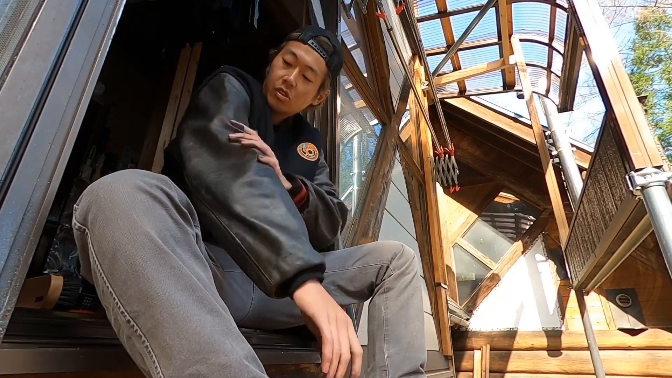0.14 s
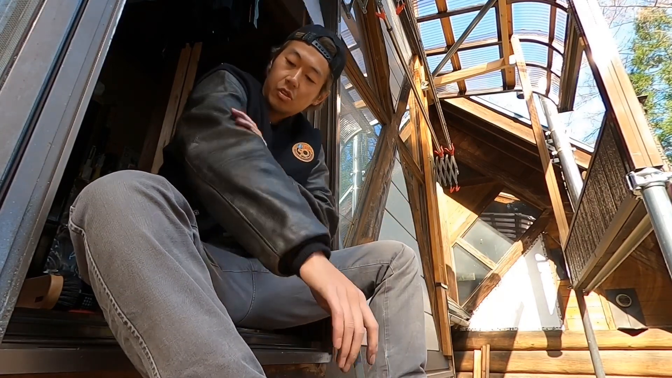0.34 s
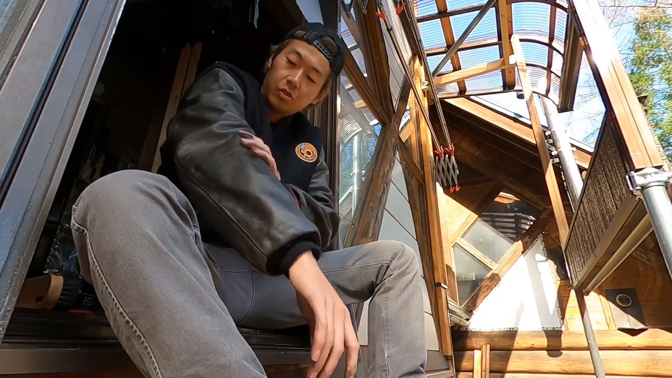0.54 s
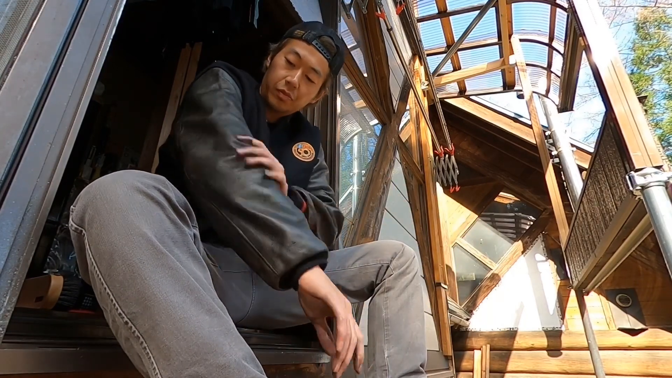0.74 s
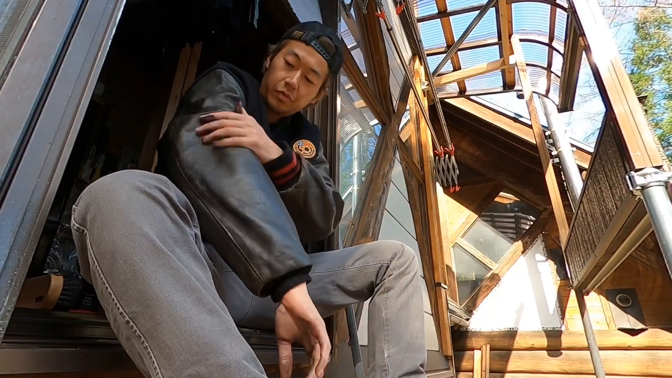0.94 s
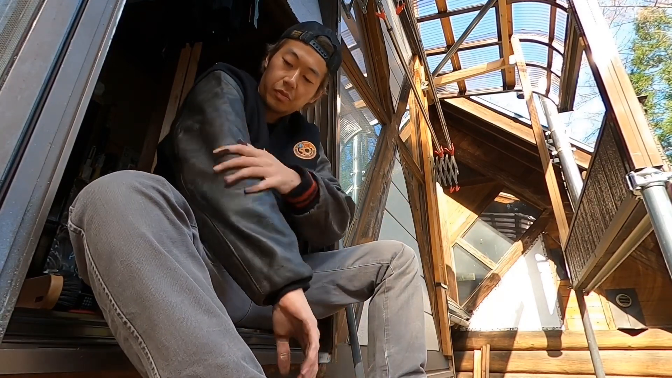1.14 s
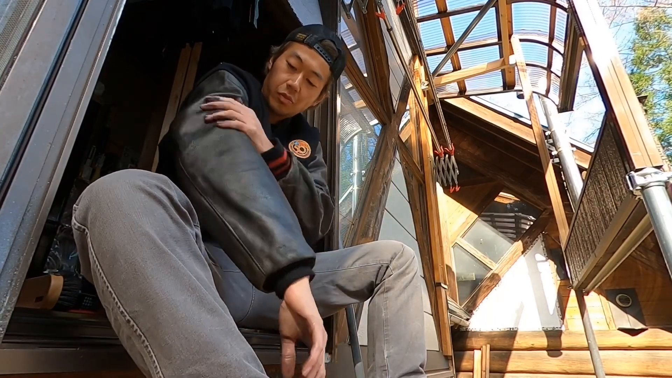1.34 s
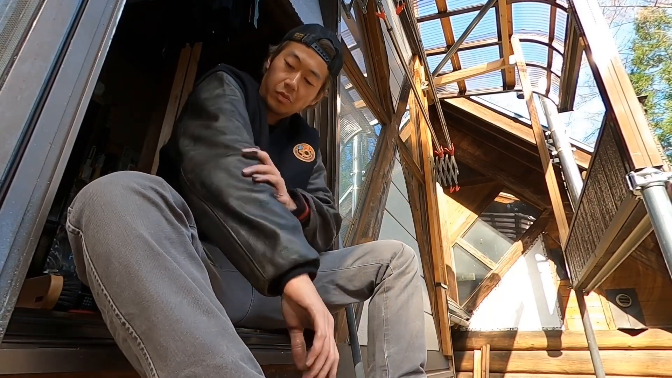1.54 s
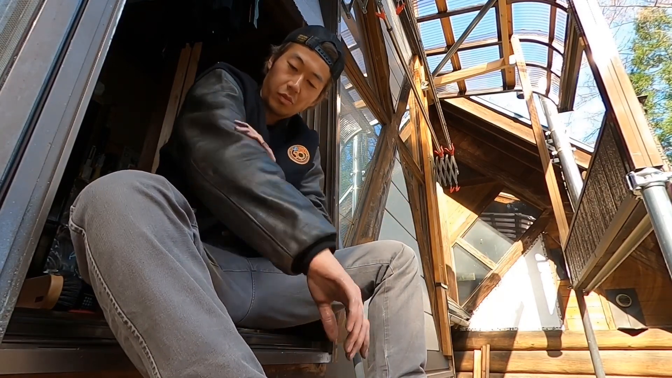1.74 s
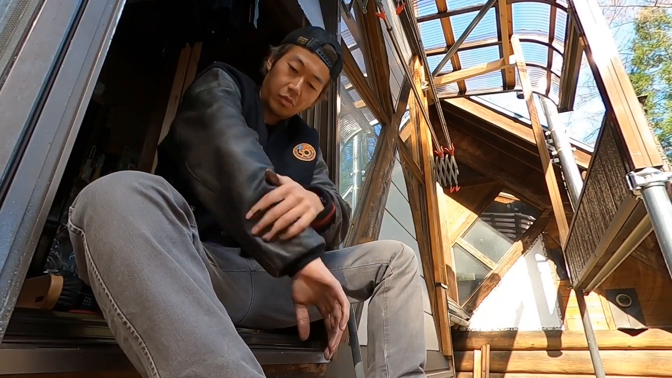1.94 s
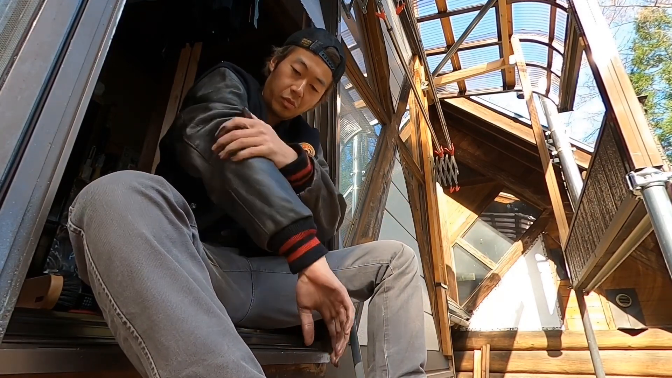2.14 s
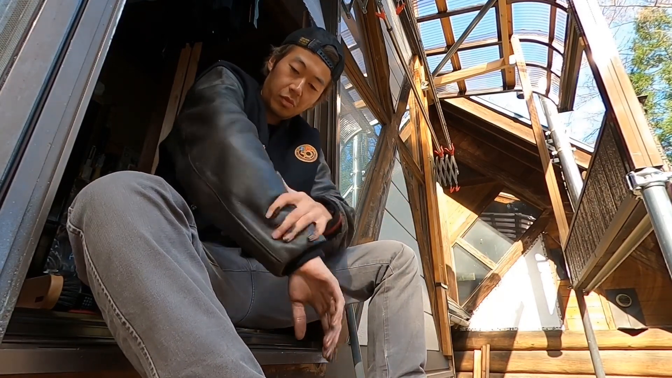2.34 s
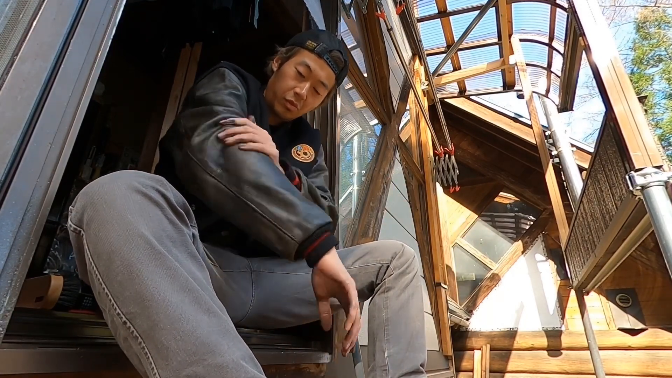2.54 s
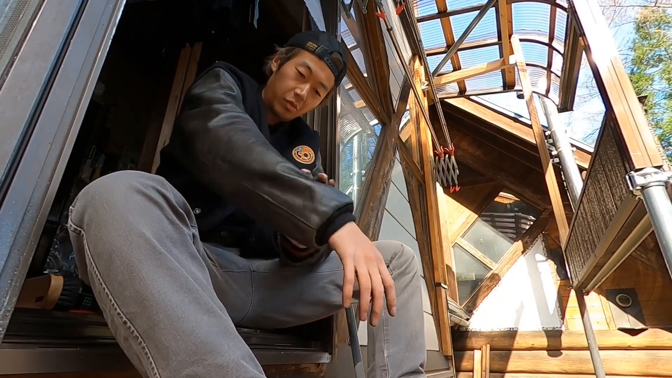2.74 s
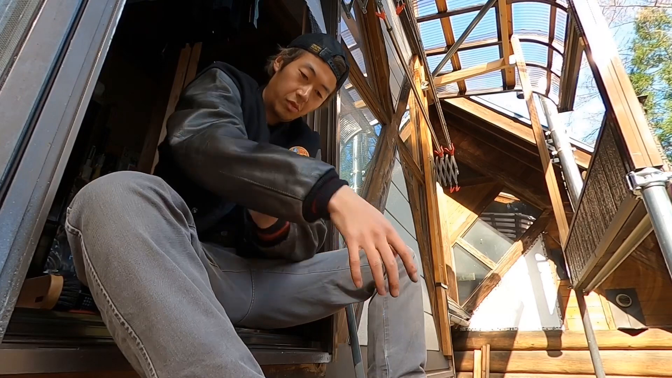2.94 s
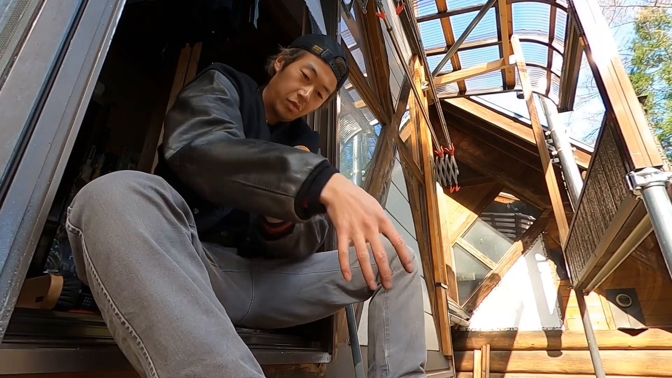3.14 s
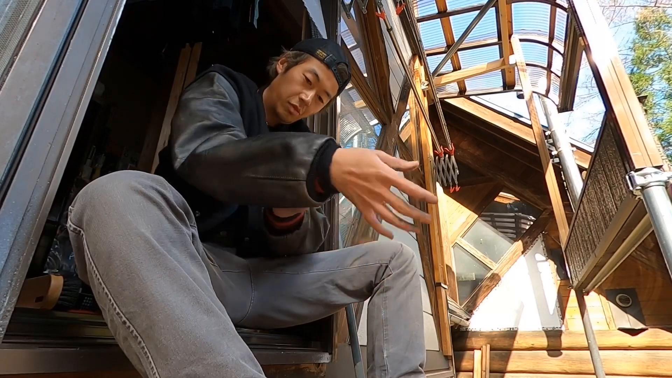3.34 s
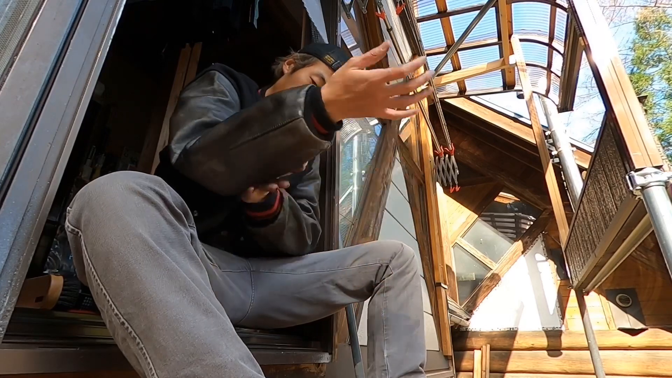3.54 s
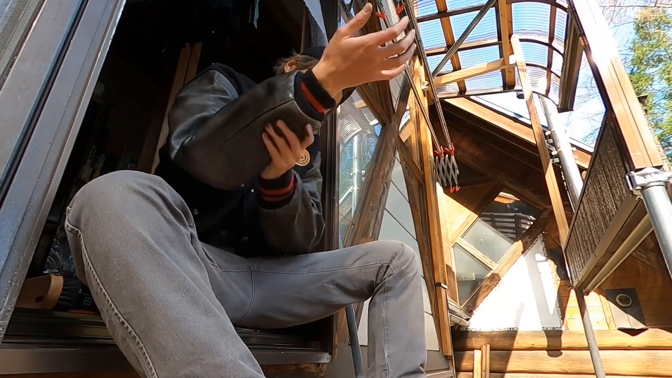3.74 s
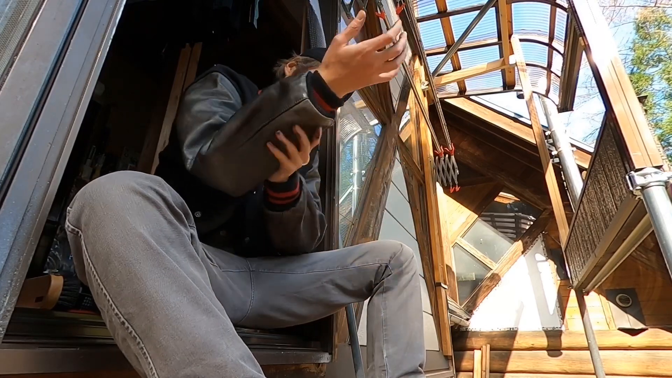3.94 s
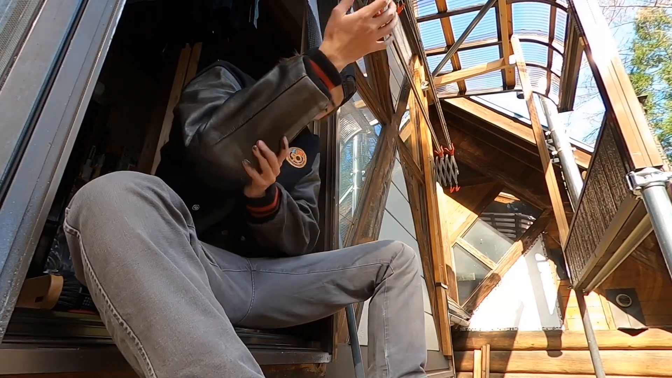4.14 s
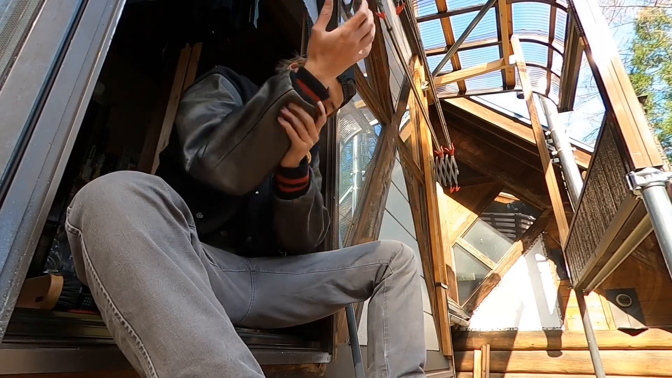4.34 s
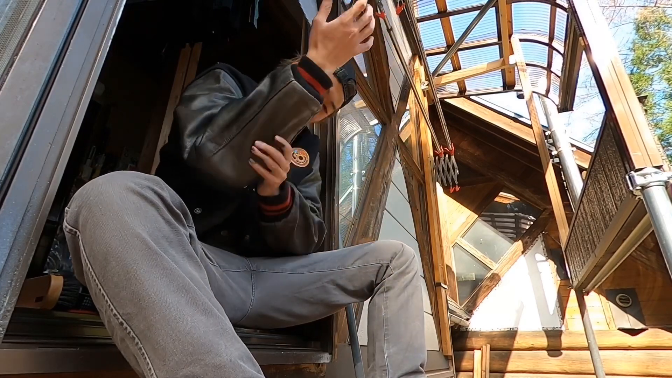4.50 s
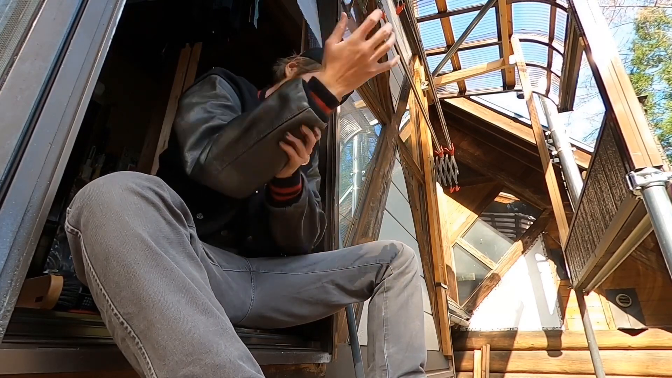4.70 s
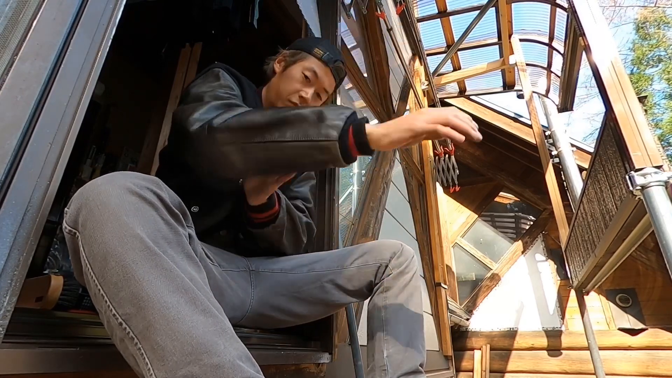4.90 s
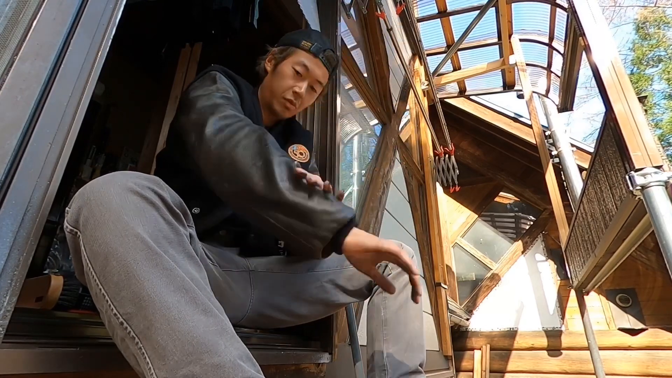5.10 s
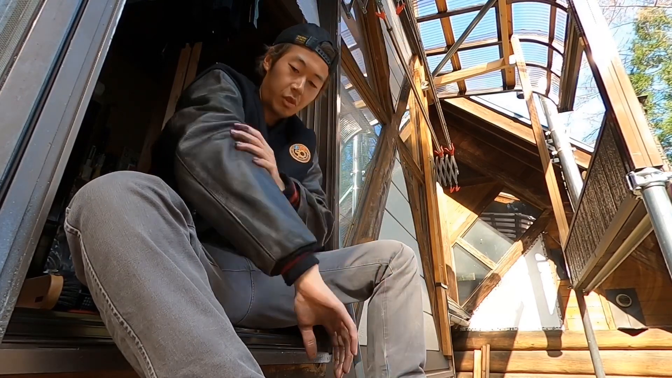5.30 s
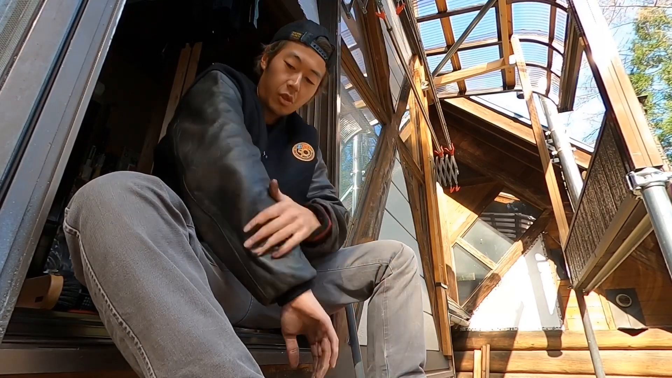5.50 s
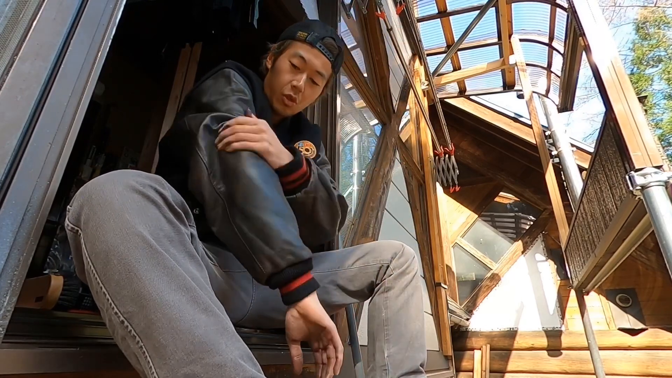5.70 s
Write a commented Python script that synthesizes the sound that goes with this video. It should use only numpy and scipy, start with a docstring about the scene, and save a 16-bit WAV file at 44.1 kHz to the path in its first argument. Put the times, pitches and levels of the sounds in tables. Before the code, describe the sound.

A bare hand rubs a leather jacket sleeve in quick back-and-forth strokes, with soft fold pops and squeaky catches, over faint outdoor air.

```python
"""A bare hand rubs a leather jacket sleeve, about six strokes a second; a man does it to himself in a doorway.
Each stroke is noise made of tiny slips, shaped in time and spectrum by hand speed; brief chirps mark catches.
The loose sleeve flutters below as lumpy low noise; folds pop as damped tones with a noise crack, creases tick.
Behind lie swaying noise for outdoor air, a few thin gliding whistles, and a low hum and drone that vary in level."""
import sys
import numpy as np
from scipy import signal
from scipy.fft import rfft, irfft
from scipy.io import wavfile
from scipy.ndimage import uniform_filter1d

SR = 44100
rng = np.random.default_rng(int(sys.argv[2]) if len(sys.argv) > 2 else 0)


def unload_audio(sound):
    """Save the sound as a 16-bit wav file, at the path given as the first command line argument."""
    columns = np.transpose(np.atleast_2d(sound))
    # keep every value between -1 and 1, then stretch to whole-number steps
    steps = np.round(np.clip(columns, -1, 1) * 32767)
    wavfile.write(sys.argv[1], SR, steps.astype(np.int16))


N = 254016
TIME_S = np.arange(N) / SR
FRAME, HOP = 512, 128  # samples
FRAME_S = np.arange(N // HOP + 5)[:, None] * HOP / SR
BIN_HZ = np.fft.rfftfreq(FRAME, 1 / SR)

# hand strokes: full_speed_s, speeding_up_s, slowing_down_s, level_db (before layer trims)
STROKES = [(0.033, 0.047, 0.14, -39.5), (0.273, 0.037, 0.035, -38), (0.439, 0.048, 0.11, -40),
           (0.636, 0.036, 0.049, -36.5), (0.859, 0.072, 0.028, -36.5), (0.953, 0.029, 0.093, -34),
           (1.195, 0.044, 0.043, -38.5), (1.381, 0.076, 0.03, -39.5), (1.555, 0.064, 0.045, -37.5),
           (1.704, 0.03, 0.033, -39.5), (1.916, 0.078, 0.044, -35.5), (2.032, 0.024, 0.039, -40),
           (2.093, 0.019, 0.051, -43), (2.137, 0.012, 0.043, -37.0), (2.367, 0.061, 0.024, -36),
           (2.49, 0.03, 0.056, -33), (2.705, 0.047, 0.1, -42), (2.953, 0.047, 0.041, -46.5),
           (3.099, 0.054, 0.04, -41.0), (3.24, 0.033, 0.05, -40.5), (3.393, 0.04, 0.028, -42.5),
           (3.524, 0.037, 0.041, -43.0), (3.713, 0.086, 0.034, -44.0), (3.852, 0.036, 0.044, -37),
           (4.037, 0.072, 0.022, -39.5), (4.152, 0.021, 0.046, -37.0), (4.342, 0.064, 0.03, -38),
           (4.485, 0.035, 0.051, -39.0), (4.669, 0.053, 0.029, -39.5), (4.863, 0.049, 0.072, -44.5),
           (5.074, 0.025, 0.07, -48.5), (5.335, 0.056, 0.044, -37.5), (5.51, 0.045, 0.039, -35.5),
           (5.657, 0.055, 0.069, -34)]
# skin sliding on leather, relative spectrum: frequency_hz, density_db
RUB_SPECTRUM = [(200, -7.5), (500, -7.5), (780, -12), (1250, -3.5), (1900, -0.5), (2400, -4.5), (3750, 1),
                (5500, -2), (6200, -7), (7600, -9.5), (9200, -29.5), (12500, -33.5), (15000, -43)]
# resonance of the hollow under the palm: time_s, pitch_hz, strength_db
HOLLOW = [(.1, 7400, 1.5), (.64, 5330, 0.5), (1.2, 3100, 1.5), (1.92, 3400, -2), (2.36, 4700, 2.5),
          (2.5, 5360, 1.5), (2.7, 1200, -0.5), (3.1, 2440, 5.5), (3.39, 3170, 7.5), (3.53, 3230, -3),
          (4.15, 4730, 2), (4.49, 3830, -1), (4.67, 1140, 2), (5.7, 1130, -1)]
# a harder stroke is brighter: at EVEN_DB it has the plain rub spectrum
BRIGHTER_DB_PER_OCTAVE_PER_DB, EVEN_DB = 0.15, -39
# spots where skin sticks and chirps: centre_s, level_db, pitch_hz
CATCHES = [(0.945, -37, 4000), (1.922, -37, 3350), (2.357, -34, 4200), (2.508, -34, 3890),
           (3.251, -49, 2830), (3.387, -42, 3500)]
# loose sleeve moving under the hand, relative spectrum: frequency_hz, density_db
SLEEVE_SPECTRUM = [(30, -7), (100, -6.5), (160, 2), (270, 1.5), (350, -2), (480, -15.5), (800, -26),
                   (2000, -48)]
# flutter against stroke, before trim; low while the raised arm pulls the sleeve taut: time_s, relative_db
SLACK = [(0, -9.5), (.8, -7), (1.4, -2), (2.0, -8), (2.7, -8), (3.4, -17), (4.2, -30), (5.3, -5),
         (5.7, -17.5)]
# deep folds buckling: yield_start_s, level_db (before pop and crack trims), pop_hz, crack_relative_db
FOLDS = [(0.17, -30, 247, -1), (0.255, -32.5, 284, -2), (0.462, -34.5, 273, 1), (0.504, -22, 258, -6.5),
         (0.526, -30, 296, -8.5), (0.779, -33, 288, -12), (0.833, -30, 277, -14), (1.008, -31, 290, 6.5),
         (1.295, -31, 293, -13), (1.352, -32, 205, 0.5), (1.868, -31.5, 214, -13), (1.917, -31.5, 199, 1),
         (2.132, -25, 210, -1.5), (2.376, -33.5, 250, -8), (2.561, -32.5, 311, -4),
         (2.655, -37.5, 232, -21), (2.709, -37.5, 270, -13), (3.695, -32.5, 138, -2.5),
         (4.473, -33.5, 174, -15), (4.938, -37.5, 194, 0), (4.977, -38, 240, -13), (5.331, -31, 298, 0.5),
         (5.683, -28, 281, 1), (5.7, -18.5, 273, -3.5)]
# crack of a fold, relative spectrum: frequency_hz, density_db
CRACK_SPECTRUM = [(200, 1.0), (900, 1.5), (1800, 3.5), (2600, -3.0), (4000, -2.5), (7500, -17),
                  (9300, -34), (15000, -60)]
# ticks of stiff leather: start_s, envelope_peak_db, pitch_hz
TICKS = [(0.464, -32, 3680), (4.936, -37.5, 1250), (5.414, -40, 1832), (5.453, -36.5, 1860),
         (5.703, -26, 970)]
# stereo width of the jacket: frequency_hz, side_filter_db
SCATTER_WIDTH = [(300, -44), (650, -15.5), (1000, -44), (1500, -18), (2000, -22), (3400, -17), (4200, -23),
                 (7200, -36.5), (8600, -15), (10200, -4.5), (11400, -8), (12500, -23)]
# low hum: time_s, level_db (before trim and throb)
HUM_LEVEL = [(0.0, -57), (0.24, -66), (0.66, -45.5), (0.75, -55.5), (1.14, -50.5), (1.72, -58),
             (1.81, -43.5), (1.91, -57.5), (2.68, -52.5), (2.74, -59.5), (3.69, -48), (3.95, -72),
             (4.57, -47.5), (4.88, -51), (4.97, -62), (5.76, -60)]
# the hum starts a little sharp and settles
HUM_HZ, HUM_SHARP_HZ, HUM_SETTLE_S = 66.9, 4.05, 1.515
# a higher drone swells once above its resting level
DRONE_HZ, DRONE_REST_DB = 193.6, -65.5
DRONE_SWELL_S, DRONE_SWELL_LENGTH_S, DRONE_SWELL_DB = 2.08, 1.48, -53
# faint whistles outside: start_s, length_s, first_hz, last_hz, level_db
WHISTLES = [(1.746, 0.3, 1147, 1115, -53), (3.287, 0.24, 1580, 1540, -58.5), (5.37, 0.15, 1830, 1810, -59),
            (5.596, 0.2, 1770, 1750, -51)]
# outdoor air, relative spectrum: frequency_hz, density_db
AIR_SPECTRUM = [(20, -15), (45, -3.5), (100, -4.5), (180, -1), (300, -5), (550, -11), (1150, -9.5),
                (2000, -13.5), (2600, -19.5), (5500, -22.5), (7500, -31), (9300, -44.5), (15000, -66)]
AIR_DB = -50  # centre of the sway
# stereo width of the air: frequency_hz, side_minus_mid_db
AIR_WIDTH = [(60, -20.5), (350, -16.5), (1000, -28.5), (1450, -9), (3300, -12), (4500, -20), (7000, -26),
             (10000, -2)]
# colour of the two microphone ports: frequency_hz, left_minus_right_db
PORT_LEAN = [(1100, 0), (1450, 1.8), (1700, 0.8), (2400, 0.5), (3100, 0), (3900, -2), (5000, -2),
             (6500, -0.3), (12000, -0.5)]
EDGE_HZ = 15500


def amp(db):
    """Decibels to gain."""
    return 10 ** (np.asarray(db) / 20)


def unit(x):
    """Scales to an rms of 1."""
    return x / np.sqrt(np.mean(abs(x) ** 2) + 1e-20)


def read(points, hz):
    """Reads a spectrum table on a log-frequency axis."""
    f, value = np.transpose(points)
    return np.interp(np.log(hz + 1), np.log(f + 1), value)


def follow(points, s):
    """Reads every column of a control curve at time s."""
    times, *columns = np.transpose(points)
    return [np.interp(s, times, column) for column in columns]


def colour(x, points):
    """Filters a sound by a spectrum table."""
    gain = amp(read(points, np.fft.rfftfreq(x.shape[-1], 1 / SR)))
    return irfft(rfft(x) * gain, x.shape[-1])


def wander(rate_hz):
    """Random curve of rms 1, rolled off above about rate_hz."""
    hz = np.fft.rfftfreq(N, 1 / SR)
    return unit(irfft(rfft(rng.standard_normal(N)) / np.sqrt(1 + (hz / rate_hz) ** 4), N))


def add(mix, s, sound):
    """Adds a sound into the mix at time s."""
    part = mix[max(round(s * SR), 0):][:len(sound)]
    part += sound[:len(part)]


def speed(t, s, rise_s, fall_s, squareness=2.35):
    """The hand speeds up, glides and slows to its turning point."""
    return np.exp(-abs((t - s) / np.where(t < s, rise_s, fall_s)) ** squareness)


def slips(per_s, spread_db, smooth):
    """Random slips of uneven size, over the even hiss of those too small to tell apart."""
    sizes = amp(spread_db * np.minimum(rng.exponential(1, N), 5))
    clicks = sizes * rng.choice([-1, 1], N) * (rng.random(N) < per_s / SR)
    return unit(unit(clicks) + smooth * rng.standard_normal(N))


def rubbing(level_db=-0.61, grip_db=1.1, patchy_db=1.66, fleck_db=3, hollow_octaves=0.28, brightening=0.13):
    """Skin catches on the grain of the leather; the hollow under the palm colours each stroke."""
    octaves = np.log2(np.maximum(BIN_HZ, 700) / 3800)
    steepness = np.maximum(1 + brightening * octaves, .2)  # treble needs more speed than mids
    power = 0
    for s, rise_s, fall_s, db in STROKES:
        tilt_db = BRIGHTER_DB_PER_OCTAVE_PER_DB * (db - EVEN_DB) * octaves
        hollow_hz, hollow_db = follow(HOLLOW, s)
        hollow = np.exp(-(np.log2((BIN_HZ + 1) / hollow_hz) / hollow_octaves) ** 2)
        tone = unit(amp(read(RUB_SPECTRUM, BIN_HZ) + tilt_db + hollow_db * hollow))
        envelope = speed(FRAME_S, s, rise_s, fall_s) ** steepness
        power = power + (amp(db) * tone * envelope) ** 2
    # the grip flutters
    drive = slips(per_s=7000, spread_db=1.5, smooth=1.04) * amp(grip_db * wander(rate_hz=31))
    # the contact patch shifts over creases: noise smoothed over frames, then bins
    patches = uniform_filter1d(rng.standard_normal(power.shape), size=12, axis=0)
    patches = unit(uniform_filter1d(patches, size=3, axis=1))
    flecks = np.maximum(patches - 1.5, 0)  # extra gain where skin sticks and chirps
    gain = (np.sqrt(power) * amp(patchy_db * patches + fleck_db * flecks)).T
    z = signal.stft(drive, nperseg=FRAME, noverlap=FRAME - HOP)[2]
    hiss = signal.istft(z * gain[:, :z.shape[-1]], nperseg=FRAME, noverlap=FRAME - HOP)[1]
    return amp(level_db) * hiss[:N]


def catches(chirp_s=0.0056, fuzz=.06):
    """Skin sticks and lets go in a quick, rough train of slips: a short tone of jittery pitch."""
    out = np.zeros(N)
    for s, db, hz in CATCHES:
        turns = np.cumsum(hz * (1 + fuzz * wander(rate_hz=540))) / SR
        envelope = np.exp(-((TIME_S - s) / chirp_s) ** 2)
        out += amp(db) * envelope * np.sin(2 * np.pi * turns)
    return np.sqrt(2) * out


def flutter(level_db=-1, linger=1.42, lumpy_db=3.0):
    """The slack sleeve is dragged along and ripples, a little longer than the stroke lasts."""
    t = FRAME_S[:, 0]
    power = 0
    for s, rise_s, fall_s, db in STROKES:
        power = power + (amp(db) * speed(t, s, rise_s * linger, fall_s * linger)) ** 2
    ripples = colour(slips(per_s=700, spread_db=1.9, smooth=0.68), SLEEVE_SPECTRUM)
    ripples = unit(ripples * amp(lumpy_db * wander(rate_hz=31)))
    slack_db, = follow(SLACK, TIME_S)
    return amp(level_db + slack_db) * np.interp(TIME_S, t, np.sqrt(power)) * ripples


def folds(pop_db=0.7, swell_s=0.00457, ring_db=-17, ring_s=0.015,
          crack_s=0.0066, crack_rise_s=0.0035, yield_s=0.00123):
    """A fold yields and snaps through with a short crack; the damped panel swings a few times."""
    t, out = np.arange(4096) / SR, np.zeros(N)
    swing = (t / swell_s * np.exp(1 - t / swell_s)) ** 3
    ring = amp(ring_db) * (1 - np.exp(-t / swell_s)) * np.exp(1 - t / ring_s)
    crack_envelope = np.exp(-t / crack_s) * (1 - np.exp(-t / crack_rise_s))
    for s, db, hz, crack_db in FOLDS:
        pop = (swing + ring) * np.cos(2 * np.pi * hz * (t - swell_s))
        crack = unit(colour(rng.standard_normal(len(t)), CRACK_SPECTRUM)) * crack_envelope
        add(out, s + yield_s, amp(db) * (amp(pop_db) * pop + amp(crack_db) * crack))
    return out


def ticks(ring_s=0.0012, grit_db=-11):
    """Small creases flick over: a brief damped ring with some grit."""
    t, out = np.arange(1024) / SR, np.zeros(N)
    envelope = t / ring_s * np.exp(1 - t / ring_s)
    for s, db, hz in TICKS:
        grit = amp(grit_db) * unit(colour(rng.standard_normal(len(t)), RUB_SPECTRUM))
        add(out, s, amp(db) * envelope * (np.sin(2 * np.pi * hz * t) + grit))
    return out


def scattered(x, decay_s=0.0044):
    """The door frame and the body scatter a little sound that reaches the two ports unlike."""
    t = np.arange(2048) / SR
    echoes = rng.standard_normal(len(t)) * np.exp(-t / decay_s)
    echoes = echoes / np.linalg.norm(echoes)
    side = colour(signal.oaconvolve(x, echoes)[:N], SCATTER_WIDTH)
    return np.array([x + side, x - side])


def hum(hum_db=-1.0, waver=0.0088, throb_db=3.0):
    """Two low tones from far away, perhaps machinery: one throbs in level, one wavers in pitch."""
    db, = follow(HUM_LEVEL, TIME_S)
    hz = HUM_HZ + HUM_SHARP_HZ * np.exp(-TIME_S / HUM_SETTLE_S)
    level = amp(db + hum_db + throb_db * wander(rate_hz=6.6))
    low = level * np.sin(2 * np.pi * np.cumsum(hz) / SR)
    turns = np.cumsum(DRONE_HZ * (1 + waver * wander(rate_hz=4.6))) / SR
    swell = np.exp(-abs(2 * (TIME_S - DRONE_SWELL_S) / DRONE_SWELL_LENGTH_S) ** 6)
    drone = (amp(DRONE_REST_DB) + amp(DRONE_SWELL_DB) * swell) * np.sin(2 * np.pi * turns)
    return np.sqrt(2) * (low + drone)


def whistles(fuzz=.025):
    """Thin, fuzzy tones from far off, each swelling and fading as it sinks."""
    out = np.zeros(N)
    for s, length_s, first_hz, last_hz, db in WHISTLES:
        along = np.clip((TIME_S - s) / length_s, 0, 1)
        hz = (first_hz + (last_hz - first_hz) * along) * (1 + fuzz * wander(rate_hz=79.7))
        out += amp(db) * np.sin(np.pi * along) * np.sin(2 * np.pi * np.cumsum(hz) / SR)
    return np.sqrt(2) * out


def air(sway_db=1.5):
    """Soft outdoor air from all around: filtered mid and side noise, swaying a little."""
    mid, side = (unit(colour(noise, AIR_SPECTRUM)) for noise in rng.standard_normal((2, N)))
    side = colour(side, AIR_WIDTH)
    return amp(AIR_DB + sway_db * wander(rate_hz=7.2)) * np.array([mid + side, mid - side])


def scene():
    """The jacket with its scatter, over the centred hum and whistles and the wide air."""
    jacket = rubbing() + catches() + flutter() + folds() + ticks()
    return scattered(jacket) + hum() + whistles() + air()


def record(dry):
    """Each port has its own slight colour; then the band limit."""
    lean_db = read(PORT_LEAN, np.fft.rfftfreq(N, 1 / SR)) / 2
    heard = irfft(rfft(dry) * amp([lean_db, -lean_db]), N)
    lowpass = signal.firwin(511, EDGE_HZ, window=("kaiser", 9), fs=SR)
    return signal.oaconvolve(heard, lowpass[None], "same")


dry = scene()
out = record(dry)
unload_audio(out)
```